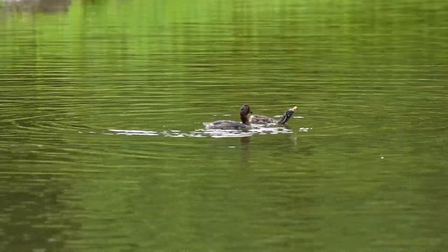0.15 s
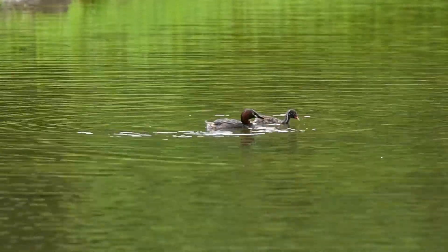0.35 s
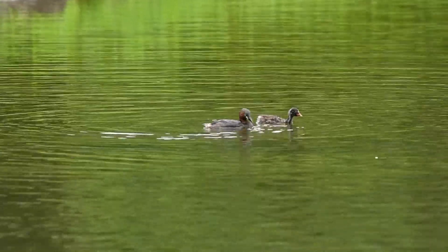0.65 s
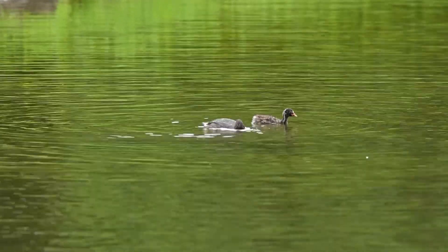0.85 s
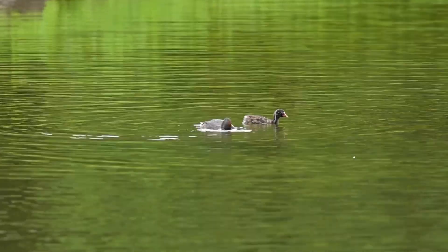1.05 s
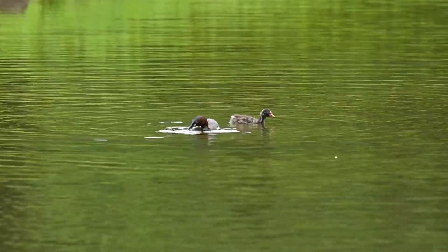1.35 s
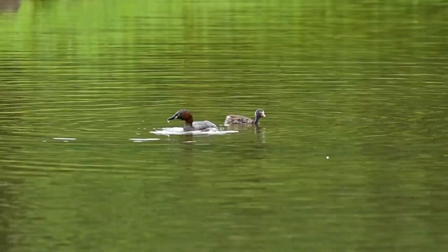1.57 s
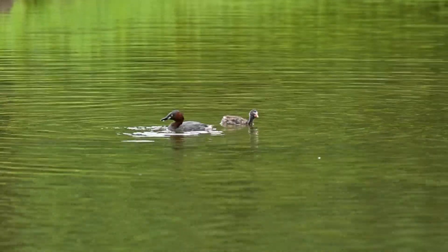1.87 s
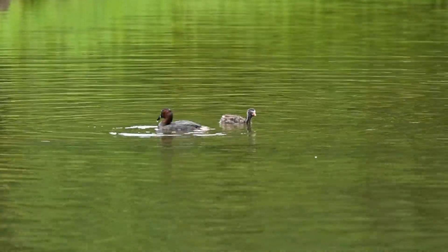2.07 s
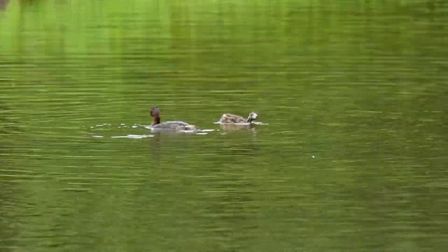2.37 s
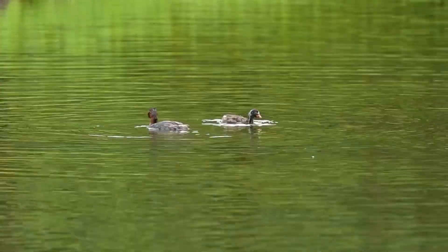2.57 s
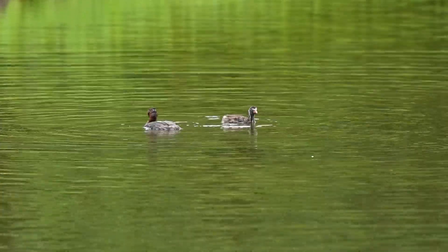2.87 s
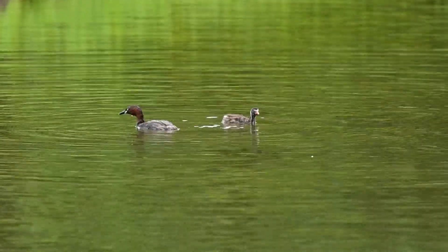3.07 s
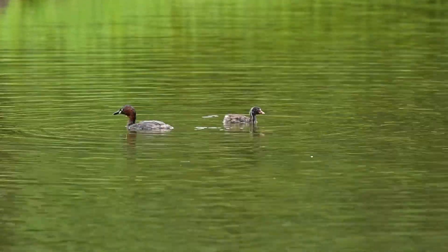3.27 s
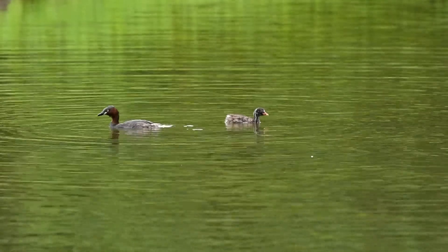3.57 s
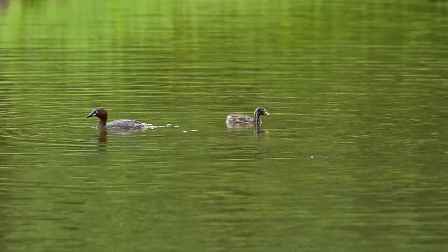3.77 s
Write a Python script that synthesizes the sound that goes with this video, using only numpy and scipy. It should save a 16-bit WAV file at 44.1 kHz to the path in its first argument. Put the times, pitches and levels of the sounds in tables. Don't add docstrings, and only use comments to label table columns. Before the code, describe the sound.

Cicadas drone loudly and continuously around a pond, a close one pulsing fast; a faint distant crow caws early and again at the end, with small water slaps midway. Outdoor stereo pickup, birds far off.

```python
import sys
import numpy as np
from scipy import signal
from scipy.fft import rfft, irfft
from scipy.io import wavfile

SR = 44100
rng = np.random.default_rng(int(sys.argv[2]) if len(sys.argv) > 2 else 0)


def store_wav(level_fs):
    pcm = np.round(np.clip(np.atleast_2d(level_fs), -1, 1) * 32767)
    wavfile.write(sys.argv[1], SR, pcm.T.astype(np.int16))


def natural_amplitude(level_db):
    exponent = np.asarray(level_db, float) / 20
    return 10 ** exponent


N = 172872
T = np.arange(N) / SR


def rms_one(x):
    return x / np.sqrt(np.mean(x ** 2) + 1e-20)


def at_hz(points, hz):
    table_hz, values = np.array(points).T
    return np.interp(np.log(hz), np.log(table_hz), values)


def drift(rate_hz):
    hold = 40
    pole = np.exp(-2 * np.pi * rate_hz * hold / SR)
    noise = rng.standard_normal(N // hold + 3002)
    slow = signal.lfilter([1], [1, -2 * pole, pole * pole], noise)[3000:]
    return np.interp(np.arange(N) / hold, np.arange(len(slow)), rms_one(slow - slow.mean()))


def sides(pan_db):
    return natural_amplitude(np.array([[pan_db / 2], [-pan_db / 2]]))


# f/Hz, left-right correlation/1
COHERENCE = [(200, .9999), (400, .995), (750, .88), (1200, .55), (1800, .05), (2900, -.35), (5000, .1),
             (13000, -.15)]


def diffuse_field(spectrum, lean, ripple_db):
    ripple_hz, skirt_db = 30, 400
    hz = np.maximum(np.fft.rfftfreq(N, 1 / SR), 1)
    below = np.maximum(np.log(spectrum[0][0] / hz), 0)
    above = np.maximum(np.log(hz / spectrum[-1][0]), 0)
    knots = rng.standard_normal((2, 2000))
    ripple = np.array([np.interp(hz / ripple_hz, np.arange(2000), ear) for ear in knots])
    level_db = at_hz(spectrum, hz) - skirt_db * (below + above)
    lean_db = at_hz(lean, hz) / 2 * np.array([[1], [-1]])
    gain = natural_amplitude(level_db + lean_db + ripple_db * ripple)

    mid, side = rfft(rng.standard_normal((2, N)))
    alike = np.clip(at_hz(COHERENCE, hz), -1, 1)
    ears = np.sqrt(1 + alike) * mid + np.sqrt(1 - alike) * side * [[1], [-1]]
    return rms_one(irfft(gain * ears, N))


# f/Hz, level/dB per Hz
LOW_SPECIES = [(3300, -69), (3800, -24.5), (4050, -19.5), (4700, -7), (5200, -0.5), (5800, -3), (6500, -1),
               (7540, -9.5)]
HIGH_SPECIES = [(4600, -33), (7820, -15), (8190, -2.5), (8630, -4), (9200, -10.5), (9480, -16.5),
                (12300, -48), (20900, -120)]
OVERTONES = [(9750, -14.5), (10300, -5), (10800, -10), (11700, -9), (13000, -14), (14300, -14),
             (15100, -18)]
# f/Hz, level difference/dB
CHORUS_LEAN = [(4000, -3.5), (5100, -3), (6000, -8.5), (7200, 0.5), (8400, -2.5), (9100, 3), (10300, 7),
               (13500, 1.5)]


def far_chorus():
    out = 0
    for spectrum, db, flicker_db, ripple_db in (
            (LOW_SPECIES, -0.5, 0.4, 2.0), (HIGH_SPECIES, -0.5, 0.9, 2.0), (OVERTONES, -13, 0.4, 2.8)):
        level = natural_amplitude(db + flicker_db * drift(68))
        out = out + level * diffuse_field(spectrum, CHORUS_LEAN, ripple_db)
    return out


def tymbal(hz, purity_hz, clicks, ring_s, right_rad):
    attack_s, weak_click_db = 0.000091, -1.5
    phase = 2 * np.pi * np.cumsum(hz + purity_hz * drift(23.87)) / SR
    since = (clicks % 1) / np.gradient(clicks)[0] / SR
    ring = (1 - np.exp(-since / attack_s)) * np.exp(-since / ring_s)
    strike = ring * natural_amplitude(weak_click_db * (clicks // 1 % 2))
    return rms_one(strike * np.sin(phase + np.array([[0], [right_rad]])))


# t/s, click lead/cycles, throb lead/cycles
PACE = [(0, .22, .1), (.8, -.17, -.08), (1.7, -.35, -.17), (2.4, -.41, -.08), (3.15, -.37, .06),
        (3.92, -.08, 0)]
# f/Hz, pitch waver/Hz, level/dB, pan/dB, right phase/rad, throb depth/dB, throb lag/cycles
BODY = [(5255, 4, -1, -3, .3, 46, .96), (5605, 8, -7.5, -8, 1.5, 30, .03), (5007, 4, -10, -10, .8, 10, .1),
        (5935, 9, -10, -11, 1.0, 6, .2), (5540, 8, -16, -8, 2.8, 8, .2), (4843, 4, -10.5, -4, .5, 12, .15),
        (4661, 4, -21, -4, 1, 3, .1), (4546, 6, -21, -4, 1, 3, .1)]
SHEEN = [(10850, 40, -18, -6, 1.6, 22, .92), (11520, 20, -22, 1, 2.4, 12, .3),
         (12300, 50, -20, 0, 1.2, 22, .4), (12950, 50, -20, -3, 1.2, 22, .52),
         (13350, 50, -22, -3, 2.1, 18, .6), (14400, 40, -21, -3, 2.0, 22, .56),
         (15050, 50, -25, 3, .6, 22, .6)]


def soloist():
    click_hz, throb_hz, sag_hz = 363.7, 16.532, 40
    s, click_lead, throb_lead = np.transpose(PACE)
    clicks = click_hz * T + np.interp(T, s, click_lead) + 0.1
    throb = throb_hz * T + np.interp(T, s, throb_lead)
    out = 0
    for rings, ring_s in ((BODY, 0.0016), (SHEEN, 0.0008)):
        for hz, purity_hz, db, pan_db, right_rad, depth_db, lag in rings:
            pitch = hz - sag_hz * np.sin(2 * np.pi * (throb - lag))
            dip_db = depth_db * np.sin(np.pi * (throb - lag)) ** 2
            level = natural_amplitude(db + 0.22 * drift(7.1) - dip_db)
            out = out + tymbal(pitch, purity_hz, clicks, ring_s, right_rad) * sides(pan_db) * level
    return out


# lowest f/Hz, highest f/Hz, click rate/Hz, ring/s, pitch waver/Hz, level/dB
SINGERS = [
    (5980, 7100, 410, 0.0011, 35, -11),
    (8110, 9100, 484, 0.0015, 35, -9),
]


def singers():
    out = 0
    for (low, high, rate, ring_s, purity_hz, db), spectrum in zip(SINGERS, (LOW_SPECIES, HIGH_SPECIES)):
        for k, (step, pace, turn, place) in enumerate(rng.random((7, 4))):
            hz = low + (high - low) * (k + step) / 7
            clicks = rate * (1.1 + 0.17 * pace) * T + step
            voice = tymbal(hz, purity_hz, clicks, ring_s, 2 * np.pi * turn)
            level = natural_amplitude(db - 1.5 + at_hz(spectrum, hz) + 1 * drift(0.13))
            out = out + voice * level * sides(at_hz(CHORUS_LEAN, hz) + 10.0 * (place - 0.5))
    return out


# f/Hz, pitch waver/Hz, click rate/Hz, ring/s, pan/dB
NEIGHBOURS = [
    (6500, 60, 355, .002, 5),
    (8900, 60, 484.2, .0012, 4),
]
# t/s, low neighbour level/dB, high neighbour level/dB
EFFORT = [(0, -12, -5), (.7, -12, -5), (.95, -9, -5.5), (1.6, -10, -8.5), (1.9, -12, -10), (2.8, -8, -16),
          (3.2, -9, -31), (3.92, -10, -23)]


def neighbours():
    s, *efforts = np.transpose(EFFORT)
    out = 0
    for (hz, purity_hz, rate, ring_s, pan_db), db in zip(NEIGHBOURS, efforts):
        voice = tymbal(hz, purity_hz, rate * T, ring_s, 1.82)
        out = out + voice * sides(pan_db) * natural_amplitude(np.interp(T, s, db))
    return out


# t/s, level/dB
SWELL = [(0.0, -23.5), (0.06, -22.5), (2.82, -21.5), (3.9, -22), (3.92, -22.5)]


def cicadas():
    body_cut = signal.butter(6, 4960, "high", fs=SR, output="sos")
    near = signal.sosfilt(body_cut, soloist() + singers() + neighbours())
    return natural_amplitude(np.interp(T, *np.transpose(SWELL))) * (near + far_chorus())


# f/Hz, level/dB per Hz
AIR = [(13, -44), (22, -8.5), (102, 4), (367, -4), (418, -6), (506, -3), (563, -5), (1350, -4),
       (3600, -3.5), (4680, -19), (7920, -120)]
# f/Hz, level difference/dB
AIR_LEAN = [(400, -0.5), (800, -1.5), (1200, -2), (1600, -1.5), (2200, -9), (3200, -7)]


def air_rumble():
    return natural_amplitude(-49.5) * diffuse_field(AIR, AIR_LEAN, 0.0)


# t/s, f/Hz, level/dB
CAWS = [
    [(.255, 162, -57), (.278, 173.5, -48), (.308, 179.6, -45), (.34, 182, -47), (.396, 179.9, -44.5),
     (.52, 163.7, -45.5), (.582, 153.5, -47), (.634, 140, -46), (.66, 134, -65)],
    [(3.57, 187, -61), (3.59, 186.5, -43), (3.682, 192.4, -44), (3.732, 192.3, -45.5), (3.82, 174.8, -42.5),
     (3.85, 169.9, -45), (3.92, 150, -46.5)],
]
# harmonic number, then level/dB at five even steps from start to end
PARTIALS = [
    [(6, -21, -21, -20, -22, -25), (7, 2, 4.5, 1, -2, -14), (8, -12, -3, -3, -13, -20),
     (9, -18, -7, -18, 1, -4), (10, -22, -24, -26, -10, -2)],
    [(5, -14, -1, -3, -18, -20), (6, -16, -16, -16, -12, -10), (7, -7, -2, 0, 0, -5),
     (8, -12, -7, -6, -4, -15), (9, -23, -21, -21, -16, -12)],
]


def crow_caws():
    out = np.zeros(N)
    for contour, partials in zip(CAWS, PARTIALS):
        s, hz, db = np.transpose(contour)
        pitch = np.interp(T, s, hz) * (1 + 0.002 * drift(30))
        phase = 2 * np.pi * np.cumsum(pitch) / SR
        level_db = np.interp(T, s, db, left=-150, right=-150) - 4.5
        progress = np.clip((T - s[0]) / (s[-1] - s[0]), 0, 1)
        for k, *steps_db in partials:
            partial_db = np.interp(progress, np.linspace(0, 1, len(steps_db)), steps_db)
            out += natural_amplitude(level_db + partial_db + 0.83 * drift(6)) * np.sin(k * phase)
    return out


# t/s, length/s, start f/Hz, end f/Hz, level/dB
WHISTLES = [(1.1, .05, 1050, 1110, -68), (1.16, .05, 1120, 1090, -68), (1.733, .024, 1880, 1900, -56),
            (1.756, .014, 1850, 1900, -55), (1.772, .016, 1950, 1980, -58), (1.79, .07, 1450, 1380, -65),
            (2.64, .12, 1400, 1360, -64), (2.8, .07, 1230, 1190, -67)]


def whistles():
    out = np.zeros(N)
    for s, length, start_hz, end_hz, db in WHISTLES:
        u = np.clip((T - s) / length, 0, 1)
        phase = 2 * np.pi * np.cumsum(start_hz + (end_hz - start_hz) * u) / SR
        out += natural_amplitude(db + 7.5) * np.sin(np.pi * u) * np.sin(phase)
    return out


def distant_birds():
    direct = crow_caws() + whistles()
    lag = int(0.045 * SR)
    echo = np.r_[np.zeros(lag), direct[:-lag]]
    return direct * sides(-2) + natural_amplitude(-24) * echo * sides(-29.0)


# t/s, peak level/dB, length/s, brightness (-1 to 1), pan/dB
SPLASHES = [
    (2.217, -37, 0.005, -0.6, -13),
    (2.312, -38, 0.003, 0.4, -14),
    (2.428, -48, 0.004, .3, -6),
    (2.4345, -35, .0045, -0.1, -15),
    (2.455, -25.5, 0.0016, -0.2, -16),
    (2.459, -44, 0.005, -0.6, -6),
    (2.483, -46, .005, 0.2, -12),
]
# f/Hz, bandwidth/Hz, level/dB
CAVITIES = [(330, 90, -11), (540, 150, -10), (780, 150, -8), (1130, 200, -5), (1550, 200, -8),
            (1920, 180, -1), (2400, 250, -2), (3000, 400, -9), (3600, 500, -7)]


def splashes():
    out = np.zeros((2, N))
    span = slice(int(2.2 * SR), int(2.6 * SR))
    t = T[span]
    walks = rng.standard_normal((len(CAVITIES), len(t)))
    for (hz, width_hz, cavity_db), steps in zip(CAVITIES, walks):
        wide = min(hz / 1500, 1) ** 2
        burst = 0
        for s, db, length, bright, pan_db in SPLASHES:
            u = np.maximum(t - s, 0) / length
            level = natural_amplitude(db + cavity_db + 2.2 * bright * np.log2(hz / 1500))
            burst = burst + level * 4 * u * np.exp(-1.5 * u) * sides(pan_db * wide)
        phase = 2 * np.pi * hz * t + np.sqrt(2 * np.pi * width_hz / SR) * np.cumsum(steps)
        tone = burst * np.sin(phase + wide * np.array([[0], [1.5]]))
        b, a = signal.iirpeak(hz, hz / width_hz / 2, fs=SR)
        out[:, span] += signal.lfilter(b, a, tone + 1e-18)
    return out


def scene():
    return cicadas() + air_rumble() + distant_birds() + splashes()


def band_limit(x):
    return signal.sosfilt(signal.butter(12, 15490, fs=SR, output="sos"), x)


# f/Hz, bandwidth/Hz
NOTCHES = [(7675, 170), (9605, 200), (7675, 170), (9605, 200)]


def record(dry):
    for hz, width_hz in NOTCHES:
        b, a = signal.iirnotch(hz, hz / width_hz, fs=SR)
        dry = signal.lfilter(b, a, dry)
    top_cut = signal.cheby2(10, 17, 15260, fs=SR, output="sos")
    mix = signal.sosfilt(top_cut, dry)
    return band_limit(mix)


dry = scene()
out = record(dry)
store_wav(out)
```